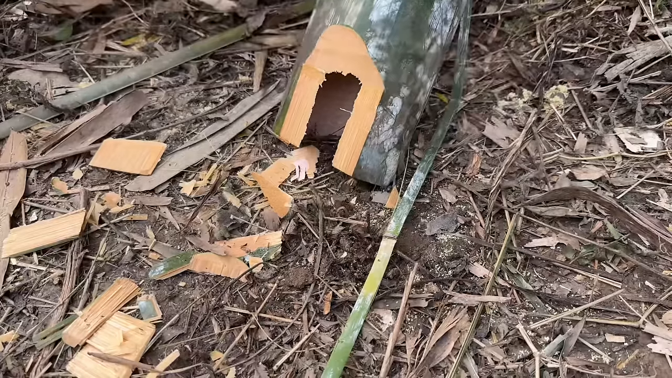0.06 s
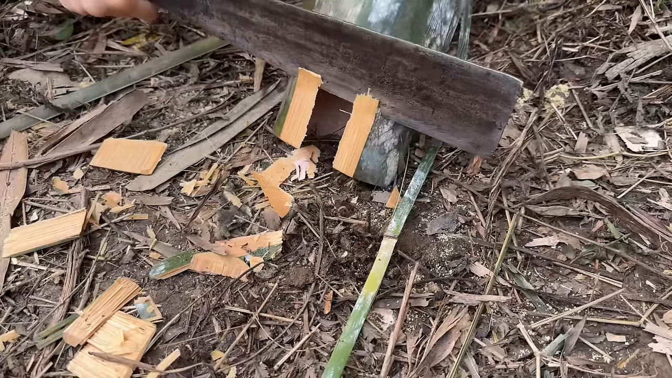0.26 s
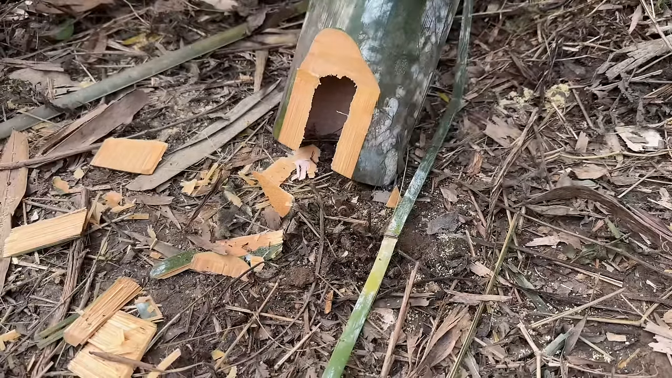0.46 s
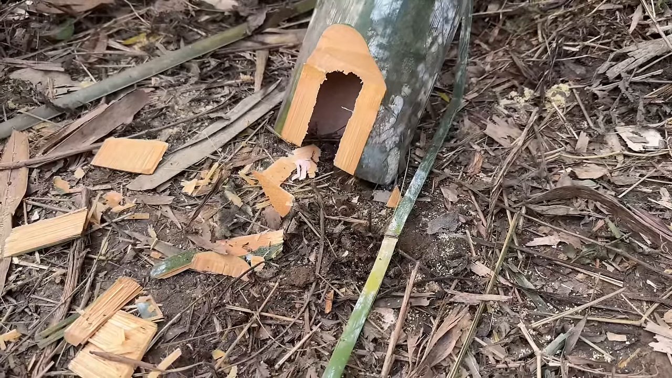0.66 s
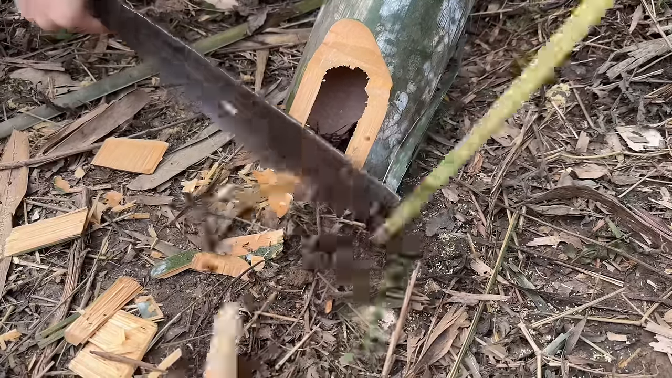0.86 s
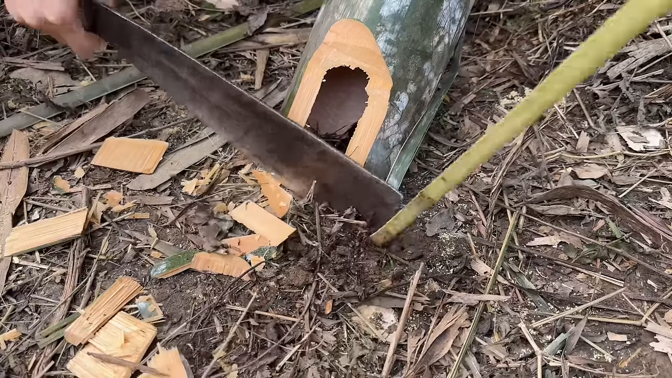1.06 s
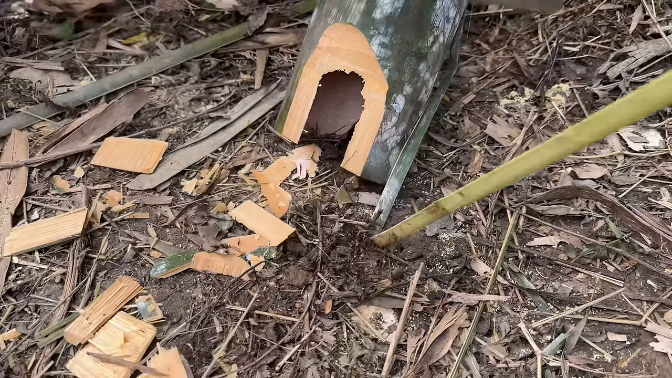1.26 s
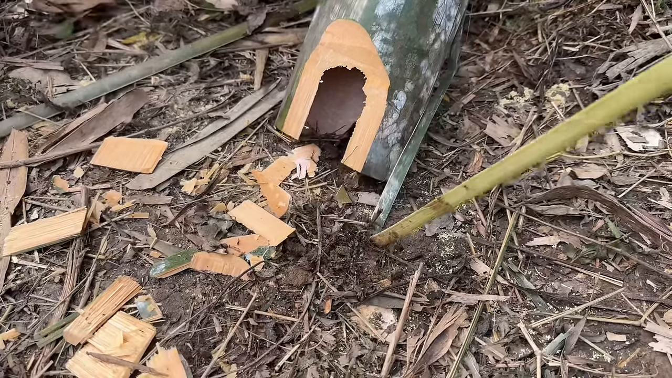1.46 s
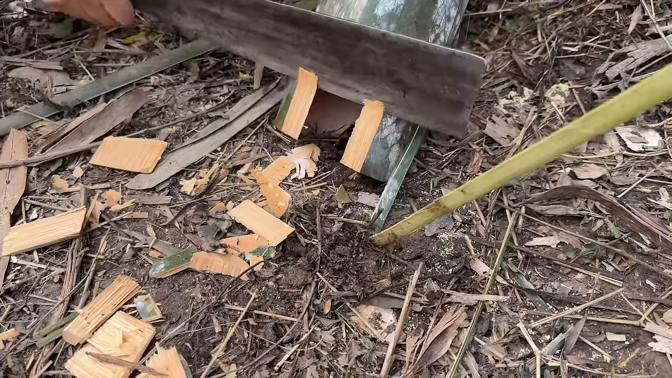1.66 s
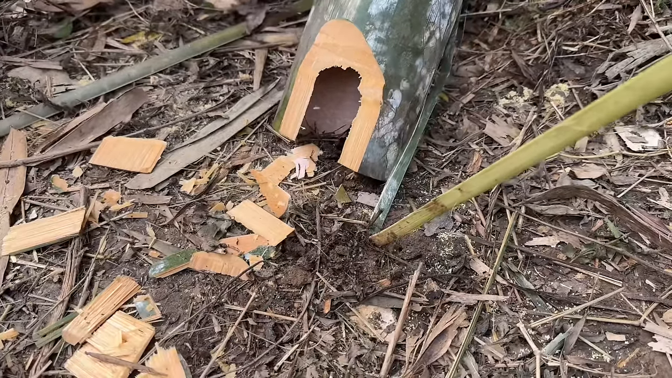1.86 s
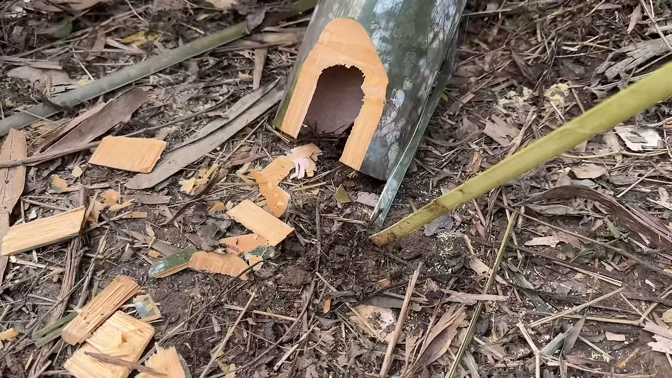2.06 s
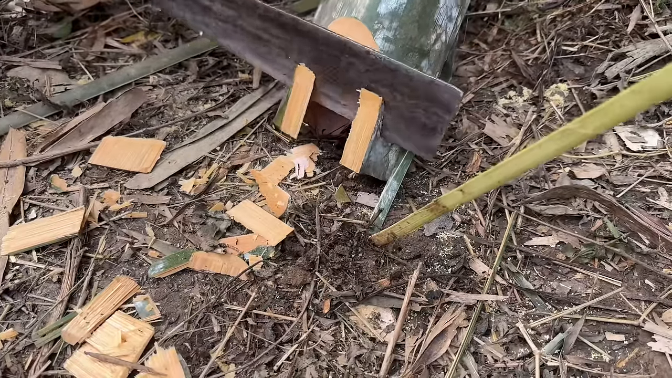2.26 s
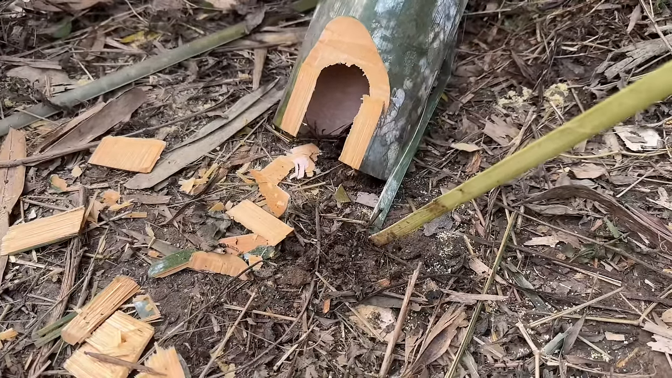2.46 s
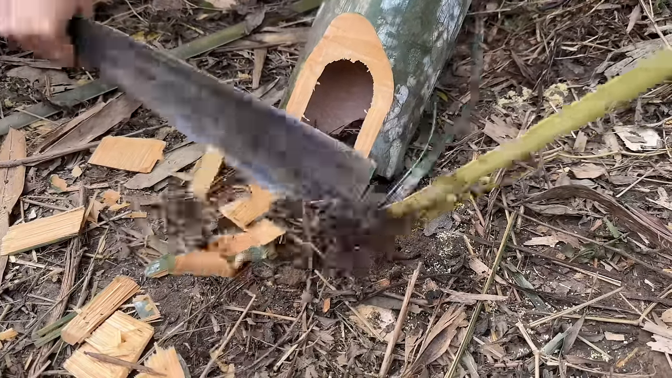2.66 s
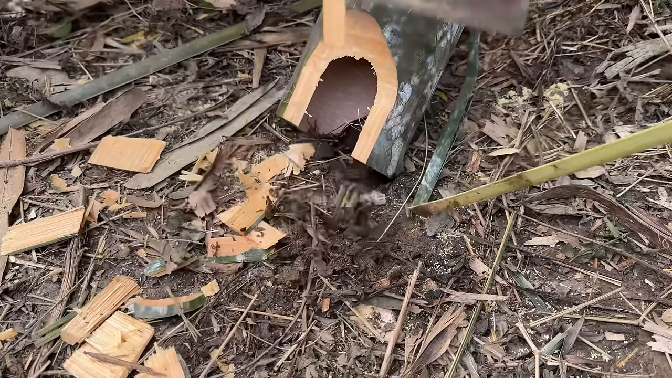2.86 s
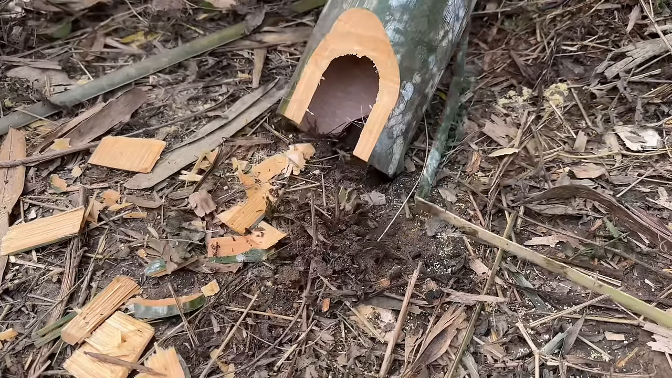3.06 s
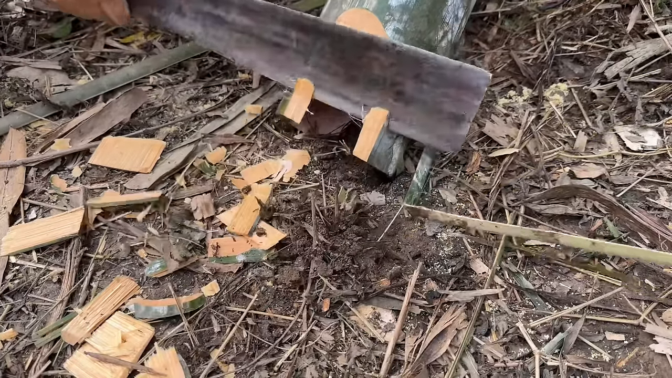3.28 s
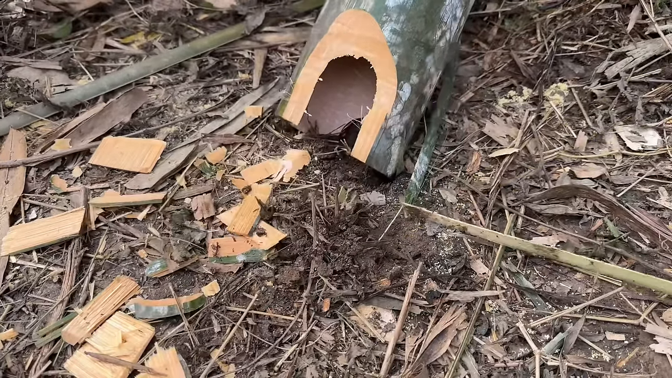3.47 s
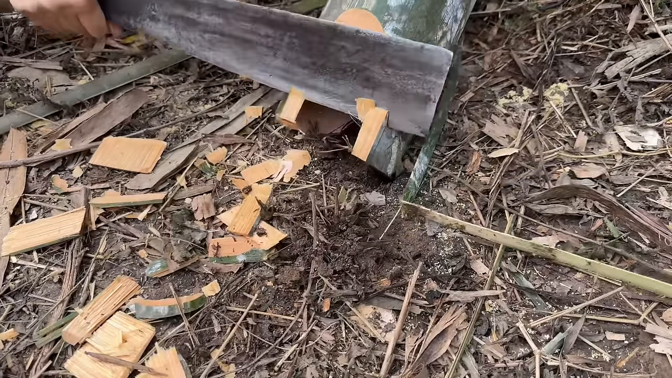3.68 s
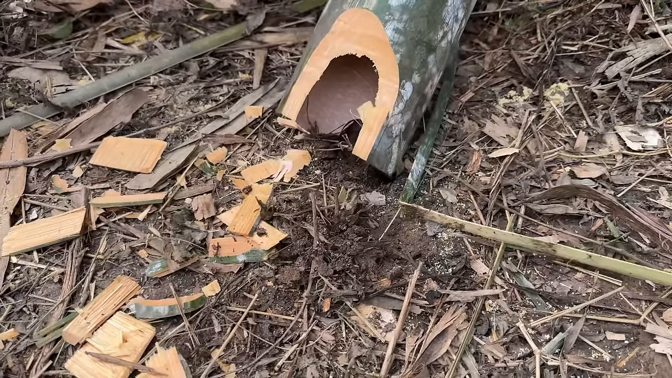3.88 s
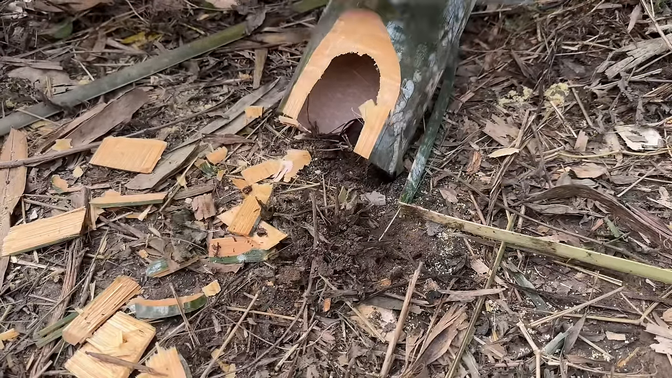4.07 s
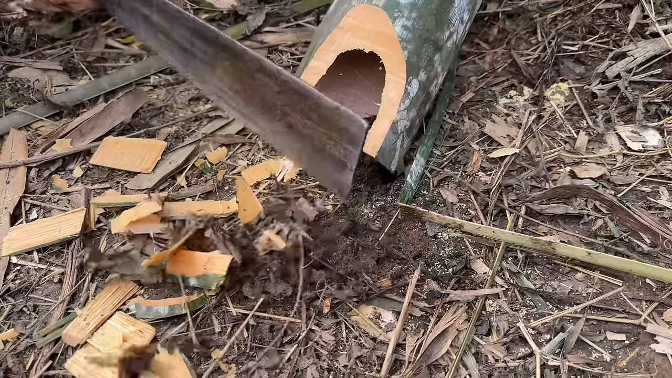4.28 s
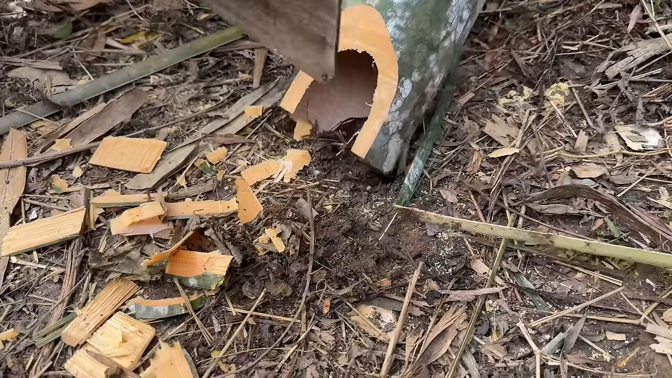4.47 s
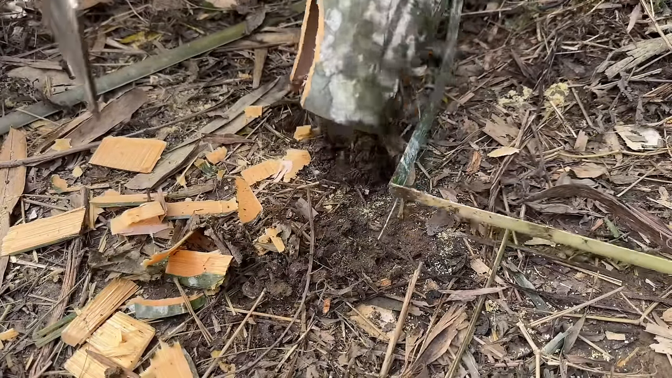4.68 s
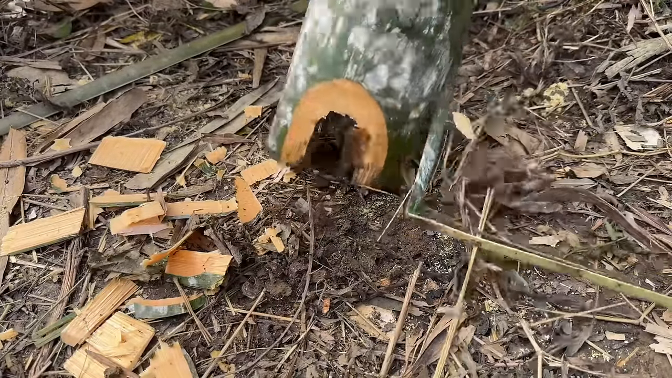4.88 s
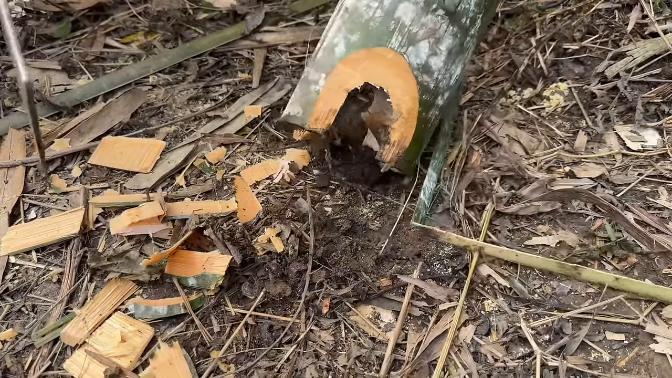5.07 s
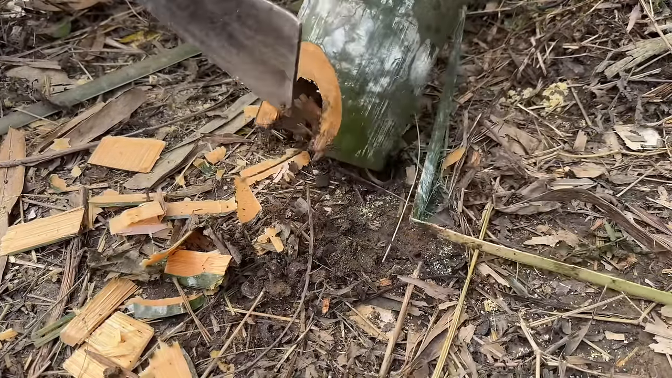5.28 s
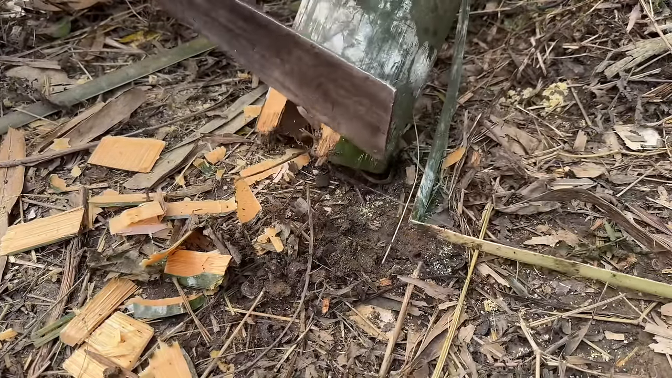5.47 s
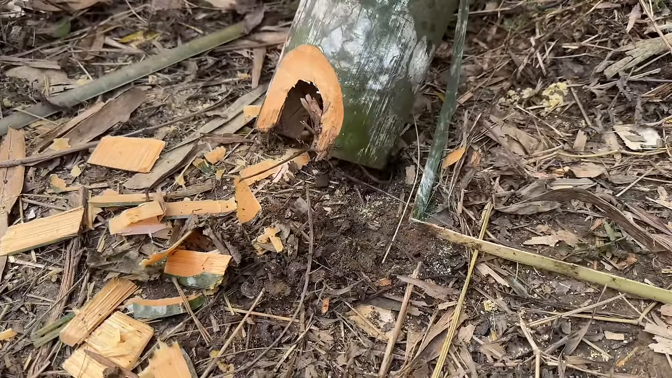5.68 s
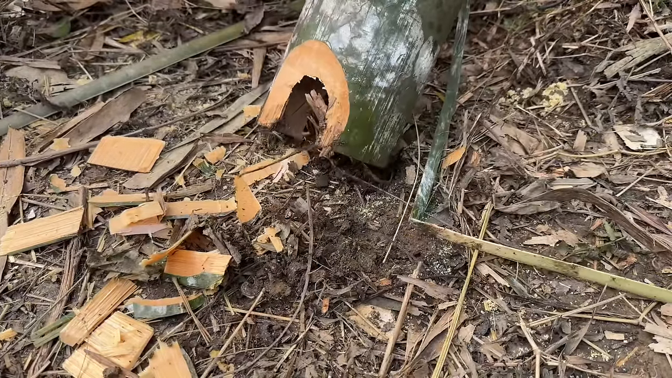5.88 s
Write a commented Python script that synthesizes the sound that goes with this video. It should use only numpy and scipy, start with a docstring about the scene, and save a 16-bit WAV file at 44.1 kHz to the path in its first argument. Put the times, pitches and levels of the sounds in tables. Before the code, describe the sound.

Close mono pickup of a large knife chopping a thick bamboo stalk on forest litter. Blows come about every half second, each a bright hard crack with splintering fibres, a brief hollow note and a soft ground thud. Chips tick in the leaves between them. After the eighth blow there is a longer gap, then one more chop. A faint dull rumble and hiss lie underneath.

```python
"""Chopping a bamboo stalk

A heavy blade chops a thick hollow bamboo stalk lying on forest litter, close to a mono microphone.
Each blow drives the modes of the wall with impulsive fracture noise, sounds the air in the hollow
joint, thuds the ground and rings the blade. Bursts of coloured noise and thin blade modes tick among
the leaves, over a dull outdoor rumble and a hiss made of filtered noise."""
import sys
import numpy as np
from scipy import signal
from scipy.fft import rfft, irfft, next_fast_len
from scipy.io import wavfile
from scipy.ndimage import uniform_filter1d, map_coordinates

SR = 44100
rng = np.random.default_rng(int(sys.argv[2]) if len(sys.argv) > 2 else 0)


def log_audio(samples):
    """Write samples as a 16-bit WAV file to the path given in sys.argv[1]."""
    # one column per channel
    frames = np.atleast_2d(samples).T
    # limit to full scale, then quantise
    limited = np.clip(frames, -1, 1)
    pcm = np.round(limited * 32767).astype(np.int16)
    wavfile.write(sys.argv[1], SR, pcm)


N = 261513
EARLY = 1764  # samples kept ahead of each contact
SPAN = 12288  # samples in one event


def amp(db):
    """Decibels: the amplitude ratio of a level difference."""
    return 10 ** (np.asarray(db) / 20)


def unit(x):
    """Normalisation: x scaled to an rms of 1."""
    return x / np.sqrt(np.mean(x ** 2) + 1e-20)


def along(points, hz):
    """Logarithmic frequency scale: (hz, value) points interpolated on a log axis."""
    point_hz, value = np.transpose(points)
    return np.interp(np.log(hz + 1), np.log(point_hz + 1), value)


def filtered(x, response):
    """Linear filtering: the spectrum of x times a complex response of frequency."""
    length = next_fast_len(len(x) + 4096)
    spectrum = rfft(x, length) * response(np.fft.rfftfreq(length, 1 / SR))
    return irfft(spectrum, length)[:len(x)]


def resonances(modes, f):
    """Modal superposition: the causal response of (hz, width_hz, level_db) modes, alternating in sign."""
    total = 0
    for k, (centre, width, db) in enumerate(modes):
        mode = 1j * f * width / (centre * centre - f * f + 1j * f * width)
        total = total + (-1) ** k * amp(db) * mode
    return total


def wobble(rate):
    """Slow fluctuation: a smooth random curve with the given number of knots a second."""
    knots = rng.standard_normal(int(N * rate / SR) + 4)
    return map_coordinates(knots, [np.arange(N) * rate / SR])


def rush(spectrum, patchy_db):
    """Modulated noise: a coloured rush of rms 1 with random gain patches in time and frequency."""
    z = signal.stft(rng.standard_normal(N), nperseg=1024)[2]
    field = uniform_filter1d(rng.standard_normal(z.shape), size=5, axis=0)
    field = uniform_filter1d(field, size=4, axis=1)
    noise = signal.istft(z * amp(patchy_db * unit(field)), nperseg=1024)[1][:N]
    return unit(filtered(noise, lambda f: amp(along(spectrum, f))))


def air():
    """Broadband ambience: a lumpy low rumble under a smoother hiss of leaves."""
    # mean levels of the two noises: start_s, rumble_db, hiss_db
    air_levels = [(0.0, -63, -62.5), (0.7, -59.5, -64), (1.501, -61.5, -62), (1.8, -63.5, -63),
                  (3.3, -60.5, -64), (4.8, -61, -62), (4.96, -58, -60), (5.93, -58, -62.5)]
    # relative spectral density of each noise: hz, level_db
    rumble_spectrum = [(15, -55.5), (25, -65.5), (51, -5.5), (92, -13.5), (158, -3), (275, -7.5), (372, -3),
                       (432, -14.5), (541, -19.5), (900, -17.5), (1170, -35.5), (1980, -120)]
    hiss_spectrum = [(290, -12), (500, -4), (538, -2), (596, -4), (641, -10), (1200, -7.5), (1310, -7),
                     (3250, -14.5), (8670, -25), (10800, -23), (15300, -28), (16500, -30)]
    start_s, rumble_db, hiss_db = np.transpose(air_levels)
    t = np.arange(N) / SR
    rumble_gain = amp(np.interp(t, start_s, rumble_db) + 0.8 * wobble(10))
    rumble = rumble_gain * rush(rumble_spectrum, patchy_db=3.0)
    hiss_gain = amp(np.interp(t, start_s, hiss_db) + 1.0 * wobble(9.2))
    return rumble + hiss_gain * rush(hiss_spectrum, patchy_db=2.0)


def add(track, s, sound):
    """Superposition: mix in an event whose contact falls at s seconds."""
    track[round(s * SR):][:SPAN] += sound  # the track itself starts EARLY samples ahead


def clock():
    """Time origin at contact: signed time, and time held at zero until the contact."""
    t = (np.arange(SPAN) - EARLY) / SR
    return t, np.maximum(t, 0)


def swell(length):
    """Gradual onset: an envelope that rises for length seconds, levels off and stops at the contact."""
    t = clock()[0]
    return np.sin(np.pi / 2 * np.clip(1 + t / length, 0, 1)) ** 2.9 * (t < 0)


def dying(t60, rise):
    """Exponential damping: an envelope that starts at the contact and falls 60 dB in t60 seconds."""
    after = clock()[1]
    return amp(-60 * after / t60) * (1 - np.exp(-after / rise))


def splinters(envelope, grit_db):
    """Fracture noise: many small breaks of varying size; the envelope sets their total energy."""
    size = amp(grit_db * unit(uniform_filter1d(rng.standard_normal(SPAN), size=12)))
    noise = unit(envelope * size * rng.standard_normal(SPAN))
    return noise * np.sqrt(np.mean(envelope ** 2))


def wall(force, colour):
    """Forced modal vibration: a force drives the wall, whose modes shift a little at random each time."""
    # bamboo wall modes, before the shift: hz, width_hz, level_db
    wall_modes = [(477, 110, -23.5), (894, 254, 0), (1158, 80, 0.5), (1630, 417, 3.5), (1866, 302, 4.5),
                  (2297, 356, 2), (2654, 155, 6.5), (2985, 180, 2), (3665, 555, 0.5), (4660, 380, -3),
                  (5520, 460, -6), (7230, 1000, -11), (10070, 1100, -11), (12800, 12000, -16.5)]
    modes = np.array(wall_modes, float)
    modes[:, 0] *= rng.normal(1, 0.014, len(modes))
    return filtered(force, lambda f: resonances(modes, f) * amp(along(colour, f)))


def tinted(colour, wood_db, treble_db):
    """Spectral tilt: a colour with more or less wood and treble."""
    lean = [(900, 0), (1700, wood_db), (2500, 0), (11000, treble_db)]
    return [(hz, db + along(lean, hz)) for hz, db in colour]


def lead_in(lead_db):
    """Selective emphasis: a short banded hiss swells before each blow."""
    # bands that stand out: hz, width_hz, level_db
    hiss_bands = [(1342, 81, 5.5), (3184, 570, -3), (4873, 430, 5), (6270, 770, 4)]
    hiss = amp(lead_db) * splinters(swell(0.032), grit_db=2)
    return filtered(hiss, lambda f: 0.71 + np.abs(resonances(hiss_bands, f)) / 2)


def fracture(wood_db, treble_db, lead_db, piece):
    """Impact excitation: an impulse and fracture noise drive the wall and the piece being cut free."""
    # colours of the crack and of tearing fibres: hz, level_db
    crack_colour = [(900, -1.5), (1700, -5), (2500, -5.5), (3400, -8.5), (5600, -5), (11000, -5.5)]
    tear_colour = [(900, -0.65), (1700, -7.5), (2500, -5), (3400, -7.5), (5600, -10), (11000, -5)]
    crack = amp(9.5) * splinters(dying(0.011, 0.0001), grit_db=4)
    crack[EARLY] = amp(19.5)  # the edge stops dead
    loose_chips = amp(-28) * splinters(dying(0.22, 0.015), grit_db=0)
    sound = wall(crack + loose_chips, tinted(crack_colour, wood_db, treble_db))
    lead = lead_in(lead_db)
    tearing = amp(2.0) * splinters(dying(0.045, 0.0007), grit_db=4.5)  # goes on after the edge stops
    sound += wall(lead + tearing, tinted(tear_colour, wood_db, treble_db))
    piece_force = 0.22 * crack + tearing + 0.34 * lead
    return sound + filtered(piece_force, lambda f: resonances(piece, f))


def hollow(hz):
    """Cavity resonance: air in the joint builds up slowly; a weaker neighbour mode makes it beat."""
    # the wider the cut, the higher and shorter the note
    t60_s = 0.17 * np.exp(-0.013 * (hz - 294.7))  # 0.17 s at 294.7 Hz; leak of 0.013 per Hz
    after = clock()[1]
    main = np.sin(2 * np.pi * hz * after)
    neighbour = np.sin(2 * np.pi * (0.834 * hz * after + rng.random()))
    extra_damping = amp(-60 * after / 0.65)
    pair = main + 0.39 * extra_damping * neighbour
    return dying(t60_s, 0.0043) * (1 - np.exp(-after / 0.0012)) * pair


def thud():
    """Damped low resonance: the stalk is pushed into the soil, a lump of noise and one soft swing."""
    after = clock()[1]
    soil = splinters(dying(0.065, 0.011), grit_db=-0.5)
    soil = filtered(soil, lambda f: resonances([(120, 130, 0)], f))
    return amp(24.5) * soil + dying(0.12, 0.052) * np.sin(2 * np.pi * 62 * after)


def ring(modes, rise):
    """Free vibration: damped (hz, level_db, t60_s) modes, at new strengths and phases each time."""
    after = clock()[1]
    total = 0
    for hz, db, t60 in modes:
        tone = np.sin(2 * np.pi * (hz * after + rng.random()))
        total = total + amp(db + rng.normal(0, 1.1)) * dying(t60, rise) * tone
    return total


def splits(track):
    """Delayed fracture: fibres give way after a blow; weaker splits drag on longer."""
    # start_s, level_db, knock_db (colour at 900 Hz)
    late_splits = [(.123, -5, -20), (0.135, -13.5, -16), (0.815, -0.5, 2.2), (0.82, -12.5, 1.5),
                   (0.84, -28.5, -28), (1.558, -15, 6.5), (2.137, -9.5, 7), (2.664, -3, 7.5),
                   (2.667, -16.5, 13.5), (4.145, -18, 7), (5.482, -6, 9)]
    for s, db, knock_db in late_splits:
        t60_s = 0.018 * amp(-0.21 * db)  # 0.21 dB of length per dB of level
        snap = splinters(dying(t60_s, 0.00033), grit_db=6.0)
        colour = [(900, knock_db), (2500, -6.5), (5000, -8.5), (10000, -10.5)]
        add(track, s, amp(db) * wall(snap, colour))


def chops():
    """Coupled radiators: each blow sounds the wall, cut piece, hollow, ground and blade together."""
    # blows: start_s, crack_db; over the crack: wood_db (near 1.7 kHz), treble_db, lead_in_db,
    # knock_hz, knock_db, clack_hz, clack_db; on their own: hollow_hz, hollow_db, thud_db, blade_db
    strokes = [(0.118, -7.5, -1.5, 4.5, -9, 970, 5.5, 2470, 4, 279, -30.5, -25.5, -25),
               (0.811, -2.5, -1, -5.5, -11, 960, 4, 2560, -2, 274, -41.5, -44.5, -58),
               (1.553, -8, -13.5, -1.5, -5.5, 868, 5.5, 2640, 0, 308, -29, -31, -33.5),
               (2.127, -7.5, -3, 3, -5.5, 934, 3.5, 2450, 12, 310, -29, -35, -37),
               (2.65, -6, 0, 0.5, -17, 1156, 6.5, 2380, 9.5, 290.7, -28.5, -28, -47),
               (3.165, -9.5, 5.5, 2, -8, 905, 0.5, 1780, -1, 312, -23.5, -32, -41.5),
               (3.656, -9, -4, 2.5, -5.5, 970, 8.5, 2250, -1, 302, -25, -34.5, -22),
               (4.129, -4.5, 0, -3.5, -8.5, 914, 10.5, 2610, -5, 314, -21.5, -31, -41),
               (5.478, -10, 10.5, -4.5, -13.5, 1098, 8.5, 2236, 11, 338, -21.5, -29.5, -39)]
    # low modes of the blade: hz, level_db, t60_s
    blade_modes = [(2126, -2, .065), (2403, -3, .14), (2540, -2, .045), (3640, -16, .055)]
    # a further blow on its way at the end: start_s (of its contact), lead_in_db
    last_lead = (5.94, -26.5)
    out = np.zeros(N + 2 * SPAN)
    for (s, crack_db, wood_db, treble_db, lead_db, knock_hz, knock_db, clack_hz, clack_db,
         hollow_hz, hollow_db, thud_db, blade_db) in strokes:
        # the piece has two notes of its own: hz, width_hz, level_db
        piece = [(knock_hz, 70, knock_db), (clack_hz, 110, clack_db)]
        sound = amp(crack_db) * fracture(wood_db, treble_db, lead_db, piece)
        sound += amp(hollow_db) * hollow(hollow_hz)
        sound += amp(thud_db) * thud()
        sound += amp(blade_db) * ring(blade_modes, rise=0.014)
        add(out, s, sound)
    splits(out)
    s, lead_db = last_lead
    hiss = splinters(swell(0.028), grit_db=1.5)
    add(out, s, amp(lead_db) * wall(hiss, [(900, 0), (8000, 0)]))
    return out[EARLY:][:N]


def ground(x):
    """Diffuse scattering: a decaying noise response stands for litter and trunks nearby."""
    t = np.arange(SR // 4) / SR
    noise = rng.standard_normal(len(t)) * amp(-60 * t / 0.11)
    tail = filtered(noise, lambda f: 1 / (1 + 1j * f / 4000))
    return signal.fftconvolve(x, tail / np.linalg.norm(tail))[:N]


def pings(track):
    """Modal excitation by light touches: the blade's high modes ring thinly."""
    # touches: start_s, top_mode_db, other_modes_db
    touches = [(2.296, -58, -69), (2.69, -64, -80), (3.708, -58, -73), (3.778, -60, -64.5),
               (5.556, -59, -47)]
    # high modes of the blade, the top one last: hz, level_db, t60_s
    edge_modes = [(6220, -6, .07), (7250, -6, .05), (12240, -5, .08), (13630, 0, .07), (15130, 0, .12)]
    rise_s = 0.0036
    for s, top_db, rest_db in touches:
        top = amp(top_db) * ring(edge_modes[-1:], rise_s)
        add(track, s, top + amp(rest_db) * ring(edge_modes[:-1], rise_s))


def ticks():
    """Transient noise: short dry bursts in the litter, and now and then the blade's thin ring."""
    # ticks and rustles: start_s, level_db, low_part_db, top_part_db
    rustles = [(0.4182, -49, 7.5, -3), (0.9018, -49.5, -8, 5), (0.9844, -49, 0, -23),
               (1.1717, -48.5, -13.5, -6), (1.719, -51, 5, -3), (1.744, -51.5, 12, -3),
               (2.2204, -47, -9.5, -8), (2.2424, -44, -1, -8), (2.2503, -50, -12.5, -23),
               (2.2918, -45, 7.5, 0), (2.3054, -47.5, 9, 3.5), (2.8205, -49, 1, -13),
               (3.093, -38, -14, -12), (3.2786, -50, 3.5, -2), (3.3253, -57, 17, 10), (3.706, -45, 5, -4),
               (3.7204, -46, 10.5, -1.1), (3.738, -50, 6.5, -2), (3.7894, -53.5, 9.5, -2),
               (4.28, -56, -13.5, -2), (4.4996, -59, 3, 9), (4.546, -52, -9.5, 2), (4.5512, -45, 6, -1),
               (4.5886, -51.5, 13.5, -18), (4.7799, -60.5, 23.5, -18), (4.7944, -49.5, 7, -24),
               (4.9061, -45, 7.5, -1), (4.9138, -36, 6.5, -29), (5.3496, -52, 10.5, -27),
               (5.557, -42, 11.5, -3)]
    out = np.zeros(N + 2 * SPAN)
    for s, db, low_db, top_db in rustles:
        colour = [(300, low_db + 1.0), (800, low_db), (2000, low_db), (5000, 0), (12000, top_db)]
        # every twig and chip has its own colour
        bumps = list(zip(np.geomspace(600, 16000, num=24), rng.normal(0, 3, size=24)))
        burst = splinters(dying(t60=0.051, rise=0.0047), grit_db=-0.5)
        burst = filtered(burst, lambda f: amp(along(colour, f) + along(bumps, f)))
        add(out, s, amp(db) * burst)
    pings(out)
    return out[EARLY:][:N]


def scene():
    """Superposition: all sources add at one microphone, given to both channels."""
    blows = chops()
    mono = blows + amp(-35.0) * ground(blows) + ticks() + air()
    return np.array([mono, mono])


def record(dry):
    """Saturation and band limiting: high peaks are rounded, deep bass and top treble roll off."""
    top_hz = 16990  # nothing passes from here up
    treble = [(15600, 1.0), (16100, -10), (16900, -30.5)]  # hz, level_db

    def microphone(f):
        """Band-pass response: second-order bass roll-off at 32 Hz and a steep treble limit."""
        bass = (1j * f / (32 + 1j * f)) ** 2
        return bass * amp(along(treble, f)) * (f < top_hz)

    rounded = dry / (1 + np.abs(dry / 0.62) ** 3) ** (1 / 3)
    return np.array([filtered(channel, microphone) for channel in rounded])


dry = scene()
out = record(dry)
log_audio(out)
```